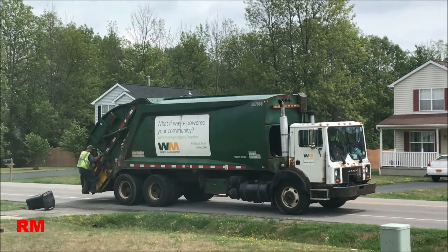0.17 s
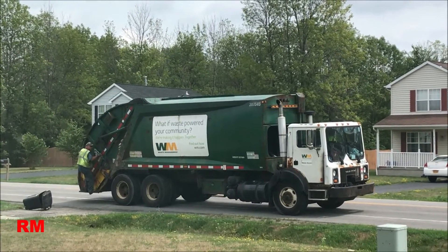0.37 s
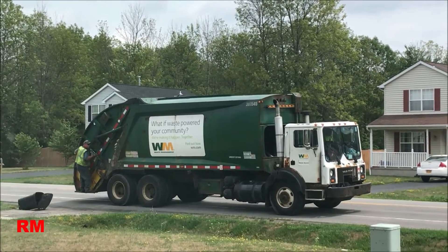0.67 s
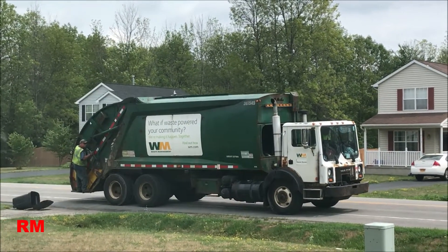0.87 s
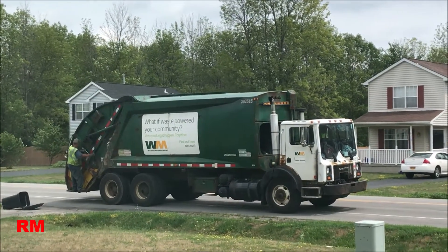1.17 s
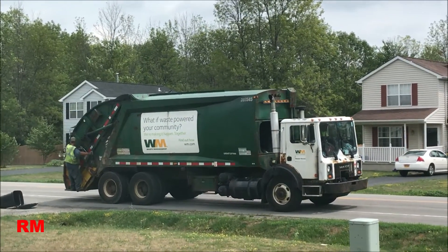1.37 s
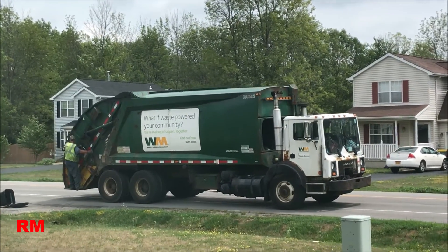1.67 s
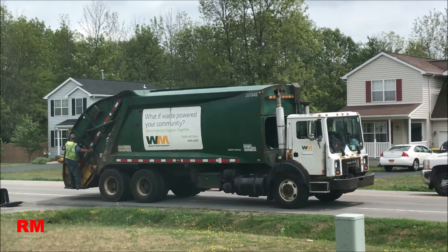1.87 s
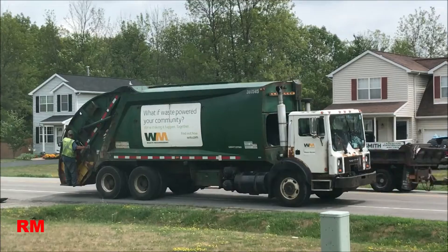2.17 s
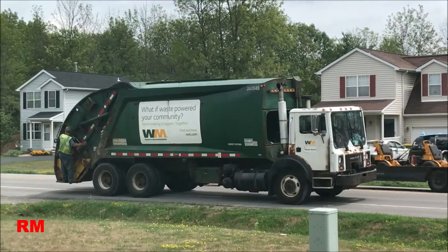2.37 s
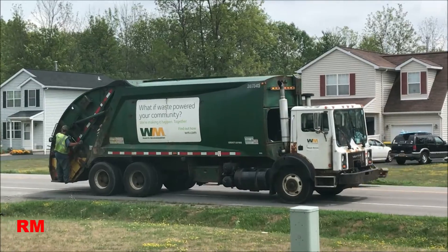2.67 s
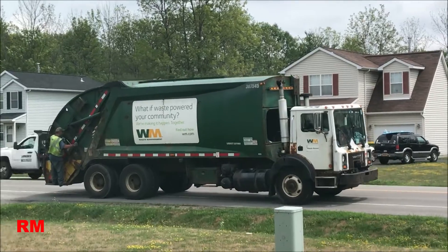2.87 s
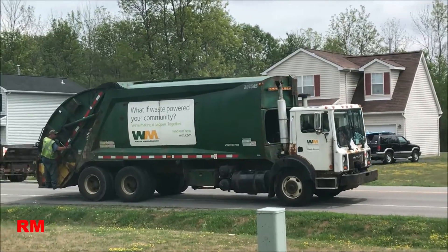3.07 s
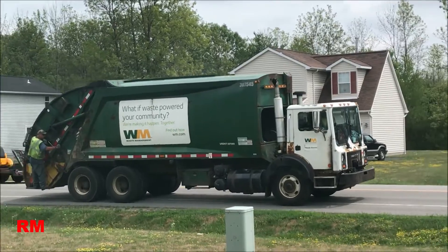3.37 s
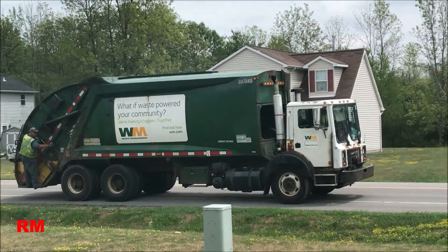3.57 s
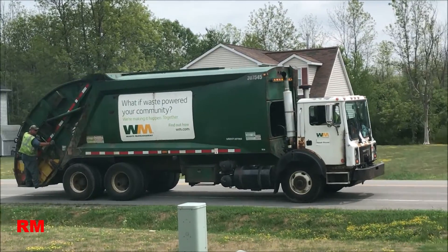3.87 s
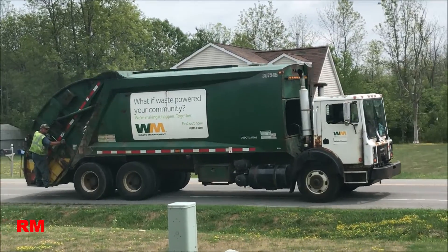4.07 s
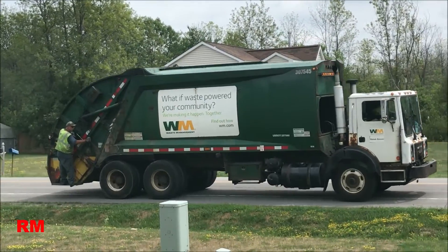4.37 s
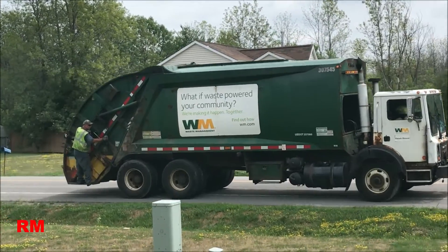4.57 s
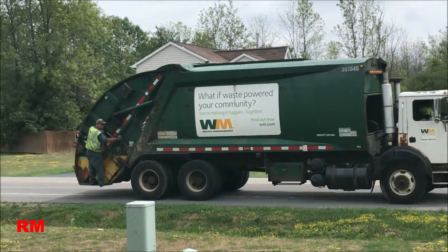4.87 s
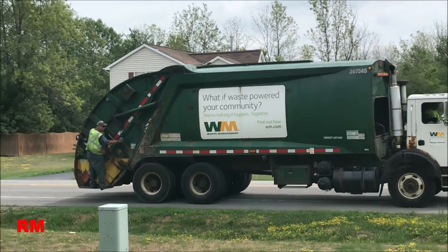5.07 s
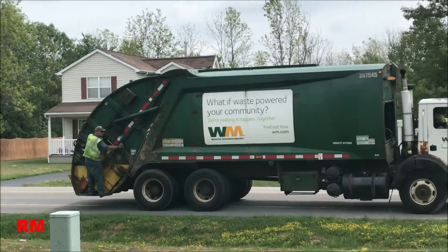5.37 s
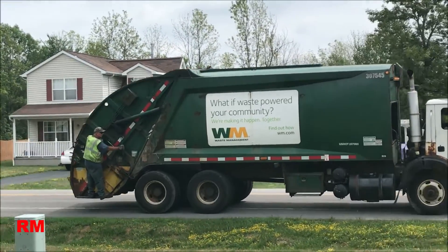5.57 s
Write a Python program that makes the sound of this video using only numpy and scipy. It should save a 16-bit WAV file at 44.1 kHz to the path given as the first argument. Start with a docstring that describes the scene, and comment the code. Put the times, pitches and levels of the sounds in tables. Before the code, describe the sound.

A garbage truck's diesel engine accelerates in booming surges as its body thumps and rattles, while sharp, dry clicks snap nearby.

```python
"""A diesel shudders and a body thumps: a refuse truck pulls away along a suburban street.
From the microphone, on a lawn across the road, its six cylinders climb to a boom, their overtones
sweeping through the exhaust pipe's resonances, then ease off. The block clatters, loose panels rattle
and buzz, and dragging brakes sing faintly. Another engine drones far off, a few sharp, dry clicks
sound close to the microphone, and now and then the treble dips for an instant."""
import sys
import numpy as np
from scipy import signal
from scipy.fft import rfft, irfft, next_fast_len
from scipy.io import wavfile

SR = 44100
rng = np.random.default_rng(int(sys.argv[2]) if len(sys.argv) > 2 else 0)


def waveform_to_disk(signal):
    """Save audio, clipped to [-1, 1], as 16-bit WAV at the path in sys.argv[1]."""
    frames = np.transpose(np.atleast_2d(signal))
    scaled = np.clip(frames, -1, 1) * 32767
    samples = np.round(scaled).astype(np.int16)
    wavfile.write(sys.argv[1], SR, samples)


N = 251811
TIME = np.arange(N) / SR

# the microphone's steady hiss: (frequency [Hz], density [dB])
HISS_SPECTRUM = [(2000, -12), (6000, 2), (7000, 1), (7700, -5.5), (8600, -0.5), (9700, -2.5), (10400, -16),
                 (11300, -2), (13000, 1), (16000, -0.5)]
# a coarser hiss that swells briefly once a second: (frequency [Hz], density [dB])
PULSE_SPECTRUM = [(1900, 7), (2500, 9.5), (3500, 2.5), (5500, -0.5), (9000, -15)]
# brief dips in the treble: (time [s], length [s], edge [Hz])
TREBLE_DIPS = [(.364, .013, 1900), (.492, .012, 1700), (.725, .014, 1400), (1.089, .012, 2200),
               (1.366, .013, 2200), (1.579, .012, 1900), (2.21, .028, 3300), (2.561, .013, 2200),
               (2.668, .012, 2200), (2.881, .013, 1800), (3.105, .025, 1300), (3.159, .012, 1800),
               (4.397, .011, 2000), (4.545, .012, 2600), (4.715, .013, 2400)]
# the far engine: (time [s], level [dB])
DRONE_LEVEL = [(0, -47.5), (.6, -51.5), (1.2, -60.5), (2.6, -58.5), (3.4, -59.5), (5.71, -61)]

# clicks by the microphone: (time [s], level [dB], knock gain [dB], tick gain [dB], low cut [Hz])
CLOSE_CLICKS = [(2.173, -33.5, -3, 1.5, 340), (2.2671, -49, -23, 11, 700), (2.322, -35, -21, -5, 676),
                (3.249, -46.5, -36, -16, 1800)]
# modes of the clicking part: (frequency [Hz], gain [dB], t60 [s])
SNAP_MODES = [(578, 10.5, 0.012), (920, -1, 0.014), (1600, -4, 0.007), (2550, 4.5, 0.002),
              (4040, 1, 0.0018), (4700, -28, 0.0025), (9150, -20, 0.0019), (11800, -11.5, 0.00075)]
# the diffuse wash after a click: (frequency [Hz], density [dB])
TAIL_SPECTRUM = [(450, 2.5), (900, 3), (1400, 0.5), (2000, -10.5), (3500, -7.5), (5000, -16.5),
                 (9000, -21.5)]

# brake drums singing across the road: (frequency [Hz], peak level [dB])
DRUM_MODES = [(2450, -84), (2640, -87), (3600, -83), (4010, -88.5), (4350, -89), (4580, -86), (4800, -84),
              (5000, -88.5)]
# a brake shoe catches: (time [s], half length [s], frequency [Hz], peak level [dB])
BRAKE_SQUEALS = [(0.32, 0.074, 4000, -81), (0.727, .025, 3930, -74), (0.88, .06, 3980, -80),
                 (1.11, .05, 3955, -72.5), (1.23, .07, 3995, -72.5), (1.385, .07, 4020, -75.5),
                 (1.3, 0.29, 3500, -83), (1.3, .2, 4300, -83), (1.556, 0.07, 4310, -77),
                 (1.4, .12, 4780, -82), (1.585, .025, 4850, -75), (1.7, 0.13, 4790, -77),
                 (1.92, .17, 4790, -82), (1.67, .03, 4030, -76), (1.98, .08, 3995, -73.5),
                 (2.18, .16, 4010, -76), (2.05, 0.2, 2600, -83), (2.1, 0.16, 3610, -78),
                 (2.497, 0.023, 3610, -73.5), (2.5, .05, 5000, -79.5), (2.74, 0.15, 5020, -79.5),
                 (2.86, .08, 4300, -79.5), (3.03, .04, 4850, -79.5), (3.05, 0.15, 4610, -81),
                 (3.5, 0.8, 2630, -81.5)]
# loose panels buzzing: (time [s], half length [s], frequency [Hz], peak level [dB])
PANEL_BUZZES = [(0.05, .18, 1560, -81), (0.03, .12, 1380, -79), (0.17, .1, 905, -76),
                (0.184, .022, 1210, -73), (0.19, .04, 1920, -77), (0.9, 1.2, 668, -75.5),
                (0.55, .45, 1010, -78.5), (1.5, .6, 930, -80), (1.455, .02, 1330, -73),
                (2.02, 0.069, 1220, -78), (2.6, .4, 630, -76), (3.7, 0.38, 1000, -81.5),
                (4.45, .15, 470, -70), (4.55, .08, 510, -70), (5.1, 0.16, 455, -72), (4.7, .35, 1600, -81),
                (4.6, 1.1, 1215, -82.5), (5.45, .45, 688, -73), (5.4, .25, 1130, -78),
                (5.4, .35, 480, -72.5)]
# the chassis rattling: (time [s], level [dB])
RATTLE_LEVEL = [(0, -75), (.4, -74.5), (1.1, -77), (2.0, -76.5), (2.7, -84), (3.4, -76.5), (4.5, -77.5),
                (5.71, -77.5)]
# modes of its loose metal: (frequency [Hz], gain [dB], t60 [s])
CHASSIS_MODES = [(700, -1.5, 0.06), (830, -4, 0.065), (950, 0, 0.055), (1060, 0.5, .05), (1211, -2, 0.079),
                 (1340, -4.5, 0.045), (1482, -4.5, .04), (1638, -5, .04), (1880, -7, 0.043),
                 (2070, -7, 0.032)]
# jolts as the truck moves off: (time [s], half length [s], peak level [dB])
BODY_JOLTS = [(0.191, 0.029, -50), (0.591, 0.013, -56)]
# modes of the jolted body: (frequency [Hz], gain [dB], t60 [s])
THUMP_MODES = [(108, 1, 0.11), (135, 6, 0.11), (165, -3, 0.081), (262, -11, 0.12), (330, -18, 0.06),
               (675, -21, 0.04), (1210, -26, 0.038)]

# engine speed: (time [s], firing rate [Hz])
FIRING_RATE = [(0, 34.3), (.3, 34.3), (.7, 42.3), (1.08, 46.3), (1.5, 49.9), (2.3, 57.7), (2.7, 62.6),
               (2.9, 66.3), (3.3, 72.8), (3.6, 77.3), (4.1, 80.7), (4.7, 93), (4.95, 91.6), (5.3, 87.7),
               (5.71, 80.4)]
# turbulent noise: (time [s], exhaust rumble [dB], block and tyres [dB], intake hiss [dB])
TURBULENCE_LEVELS = [(0, -63, -66.5, -77), (.3, -55.5, -67.5, -75), (.9, -54, -68, -74),
                     (1.5, -54, -69, -73.5), (2.1, -55.5, -67.5, -73), (2.7, -55, -70, -72),
                     (3.3, -65, -66.5, -71.5), (3.9, -61, -66.5, -72.5), (4.5, -60.5, -66.5, -72.5),
                     (5.1, -59, -65.5, -72.5), (5.71, -56.5, -67.5, -72.5)]
# the colours of those three: (frequency [Hz], density [dB])
RUMBLE_SPECTRUM = [(32, -26), (48, -3.5), (80, -0.5), (120, 0), (150, -4.5), (215, 0.5), (245, -7.5),
                   (300, -2.5), (335, -10.5), (380, -16), (500, -24.5)]
BLOCK_SPECTRUM = [(300, -2), (430, 4), (540, -1), (670, 1), (810, -5), (965, -5), (1090, -7.5),
                  (1230, -5.5), (1400, -10), (1550, -9), (1750, -12.5), (1950, -10), (2200, -13),
                  (2550, -15), (3200, -16.5), (5000, -30.5)]
INTAKE_SPECTRUM = [(1800, -14), (2500, 1.5), (3100, -3), (3600, 4.5), (3950, 7), (4300, 3), (4650, -1),
                   (5500, -6), (7000, -12)]
# base strength of the exhaust's overtones: (time [s], level [dB])
ENGINE_LOAD = [(0, -70.5), (.35, -63), (1.5, -63), (2.2, -59.5), (2.8, -59), (3.3, -55), (3.9, -58),
               (4.8, -54.5), (5.2, -56), (5.71, -52.5)]
# broad colour of exhaust pipe and body: (frequency [Hz], gain [dB])
PIPE_COLOUR = [(24, -48), (36, 1), (44, 9), (50, 11.5), (62, 3.5), (100, 3.5), (135, -5), (170, -6),
               (230, -8), (290, -11), (340, -11.5), (400, -22), (490, -14), (700, -30)]
# their narrow resonances: (frequency [Hz], width [Hz], gain [dB])
PIPE_RESONANCES = [(42.7, 7, -2), (88.5, 3.7, 3), (99, 32, 2), (171.2, 7.7, 7), (216, 13, 4.5),
                   (240, 12, 0.5), (289.7, 40, 10), (317, 19, 8), (373.5, 25, 9), (392, 11, 7)]
# overtones that stand out: (order [cycles per six firings], gain [dB])
ORDER_BOOSTS = [(7, 8.5), (9, 4), (12, 11.5), (13, 2), (16, 4.5), (18, 10), (20, 6), (22, 2), (24, 8),
                (26, 5.5), (28, 4.5), (30, 6.5), (32, 4.5), (36, 6)]
# single overtones growl: (order [cycles per six firings], time [s], half length [s], peak level [dB])
ORDER_GROWLS = [ (12, 0.53, 0.13, -52.5), (12, 1.34, 0.8, -53.5), (12, 1.95, 0.11, -55.5),
                (18, 0.74, 0.16, -55), (24, .8, 0.16, -57.5), (24, 1.257, 0.13, -56.5), (24, 1.7, .12, -55),
                (18, 2.187, 0.3, -51.5), (30, 2.428, 0.076, -51.5), (24, 2.58, 0.11, -58.5),
                (12, 2.7, .2, -54.5), (20, 2.62, 0.11, -56), (18, 2.75, 0.13, -55.5), (30, 2.85, .35, -59),
                (24, 2.93, 0.19, -56.5), (12, 3.35, 0.22, -55.5), (9, 3.14, 0.24, -50.5),
                (26, 3.04, 0.29, -54), (18, 3.26, 0.16, -51), (20, 3.23, 0.14, -53),
                (24, 3.38, 0.13, -49.5), (26, 3.65, 0.23, -58), (30, 3.6, 0.051, -61),
                (24, 3.85, 0.26, -54), (16, 3.57, 0.45, -58), (22, 3.68, .12, -55.5),
                (22, 4.08, 0.15, -54.5), (12, 4.25, 0.17, -50.5), (13, 4.13, 0.1, -53),
                (20, 4.45, 0.25, -57), (28, 3.02, .4, -61.5), (19, 4.45, 0.14, -55),
                (33, 4.54, 0.074, -62.5), (12, 4.64, 0.13, -51), (18, 4.68, .17, -53.5),
                (32, 4.85, 0.25, -66), (16, 4.9, 0.34, -54), (13, 4.92, 0.22, -53.5), (14, 5.0, .15, -56),
                (24, 4.4, .25, -59.5), (24, 5.15, 0.13, -58.5), (14, 3.94, .3, -59), (3, 5.1, 0.41, -47.5),
                (18, 5.14, 0.27, -54.5), (18, 5.6, .2, -54.5), (12, 5.55, .15, -54), (20, 5.45, 0.21, -50),
                (21, 5.68, 0.085, -49)]
# the surging boom at the firing rate: (time [s], level [dB])
BOOM_LEVEL = [(.15, -65), (.4, -49.5), (.62, -43), (.95, -52.5), (1.1, -36), (1.62, -30), (1.75, -34),
              (2.3, -37.5), (2.76, -44), (3.05, -33), (3.6, -34), (4.2, -28.5), (4.58, -35.5),
              (4.72, -46.5), (5.03, -43), (5.4, -29.5), (5.58, -30), (5.71, -41.5)]


def from_db(db):
    return 10 ** (np.asarray(db) / 20)


def unit_rms(x):
    return x / np.sqrt(np.mean(x ** 2) + 1e-20)


def in_time(rows):
    """Each column of a curve at every sample."""
    times, *columns = np.transpose(rows)
    return [np.interp(TIME, times, column) for column in columns]


def at_hz(spectrum, hz):
    """A spectrum read on a log-frequency axis."""
    points_hz, points_db = np.transpose(spectrum)
    return np.interp(np.log(np.maximum(hz, 1)), np.log(points_hz), points_db)


def swell(s, half_length, db):
    """A smooth rise and fall around a moment."""
    return from_db(db) * np.exp(-((TIME - s) / half_length) ** 2)


def drift(rate_hz):
    """A slow random wander; rms 1."""
    step, settle = 100, 1000
    pole = np.exp(-2 * np.pi * rate_hz * step / SR)
    kicks = rng.standard_normal(N // step + settle + 2)
    slow = signal.lfilter([1], [1, -2 * pole, pole * pole], kicks)[settle:]
    return np.interp(np.arange(N) / step, np.arange(len(slow)), unit_rms(slow))


def noise(spectrum, ripple_db=0.0, ripple_hz=41.14):
    """Coloured noise with steep skirts, optionally rippled by crowded panel resonances; rms 1."""
    size = next_fast_len(N)
    hz = np.arange(size // 2 + 1) * SR / size + 1
    ripple = ripple_db * np.interp(hz / ripple_hz, np.arange(1000), rng.standard_normal(1000))
    skirts = 1 / np.sqrt((1 + (spectrum[0][0] / hz) ** 8) * (1 + (hz / spectrum[-1][0] / 2) ** 8))
    colour = from_db(at_hz(spectrum, hz) + ripple) * skirts
    return unit_rms(irfft(rfft(rng.standard_normal(size)) * colour, size)[:N])


def ring(force, hz, t60):
    """One mode: a unit click starts a decaying sine of height 1."""
    pole, angle = from_db(-60 / (t60 * SR)), 2 * np.pi * hz / SR
    return signal.lfilter([0, np.sin(angle)], [1, -2 * pole * np.cos(angle), pole * pole], force + 1e-18)


def unsteady_tone(hz, width_hz):
    """A narrow band of noise around a pitch; rms 1."""
    angle = 2 * np.pi * np.cumsum(hz + np.zeros(N)) / SR
    return unit_rms(drift(width_hz) * np.cos(angle) + drift(width_hz) * np.sin(angle))


def microphone_hiss(floor_db=-76.5, every_s=1.0):
    """The microphone's fine, steady hiss; and, apart from it, a coarser hiss that swells briefly at a regular
    beat."""
    pulses = sum(swell(s, half_length=0.033, db=-69) for s in np.arange(every_s, N / SR, every_s))
    return from_db(floor_db) * noise(HISS_SPECTRUM) + pulses * noise(PULSE_SPECTRUM)


def far_engine(hz=49.67):
    """A low note from far off; it beats against the truck's firing rate as the truck moves away."""
    drone_db, = in_time(DRONE_LEVEL)
    return np.sqrt(2) * from_db(drone_db) * np.sin(2 * np.pi * hz * TIME)


def close_clicks(tick_above_hz=4500):
    """A small hard part snaps by the microphone; a heavy blow wakes its lowest mode, a light one clacks."""
    out = 0
    for s, level_db, knock_db, tick_db, low_cut_hz in CLOSE_CLICKS:
        blow = signal.unit_impulse(N, int(s * SR))
        snap = 0
        for k, (hz, mode_db, t60) in enumerate(SNAP_MODES):
            colour_db = knock_db * (k == 0) + tick_db * (hz > tick_above_hz)
            polarity = (-1) ** (k // 2)
            snap += polarity * ring(blow * from_db(level_db + mode_db + colour_db), hz, t60)
        low_cut = signal.butter(2, low_cut_hz, "high", fs=SR, output="sos")
        out += signal.sosfilt(low_cut, snap + 1e-12 * rng.standard_normal(N))
    return out


def click_tails(gain_db=-13, t60=.065):
    """A heavy click dies away in a brief wash; a light one stays dry."""
    fade = 0
    for s, level_db, knock_db, *_ in CLOSE_CLICKS:
        decay_db = 60 * np.abs(TIME - s) / t60
        fade += from_db(level_db + knock_db + gain_db - decay_db) * (TIME > s)
    return fade * noise(TAIL_SPECTRUM)


def squeal(hz, wander_hz=17.0, chatter_db=2.0, flutter_depth=.6, slip_hz=32.0):
    """A brake shoe sticks and slips: one line that wanders in pitch and flutters in level; rms 1."""
    angle = 2 * np.pi * np.cumsum(hz + wander_hz * drift(25)) / SR
    slip_angle = 2 * np.pi * np.cumsum(slip_hz * (1 + .3 * drift(15))) / SR
    flutter = 1 + flutter_depth * np.sin(slip_angle)
    chatter = from_db(chatter_db * np.clip(drift(45), -3, 1.5))
    return unit_rms(np.sin(angle) * flutter * chatter)


def brakes(width_hz=53.0, wander_hz=18.0):
    """Shoes brush their drums, faint from across the road: all modes sing, and at times some squeal."""
    singing = sum(from_db(db) * unsteady_tone(hz + wander_hz * drift(11), width_hz)
                  for hz, db in DRUM_MODES)
    squeals = sum(swell(s, half_length, db) * squeal(hz) for s, half_length, hz, db in BRAKE_SQUEALS)
    drag = swell(s=2.7, half_length=1.2, db=0)
    return drag * singing + squeals


def panel_buzz(width_hz=16.0):
    """The engine shakes one panel after another into an unsteady hum."""
    return sum(swell(s, half_length, db) * unsteady_tone(hz, width_hz)
               for s, half_length, hz, db in PANEL_BUZZES)


def chassis_rattle(knocks_per_s=45, spread_db=2.5):
    """Loose metal knocks at random; each knock rings the modes with strengths of its own."""
    rattle_db, = in_time(RATTLE_LEVEL)
    hits = rng.random(N) < knocks_per_s / SR
    knocks = hits * from_db(spread_db * np.clip(rng.standard_normal(N), -2, 2))
    ringing = sum(from_db(db) * ring(knocks * rng.uniform(-0.96, 1, N), hz, t60)
                  for hz, db, t60 in CHASSIS_MODES)
    return from_db(rattle_db) * unit_rms(ringing)


def body_thumps():
    """As the truck jerks into motion, panels knock together in a brief flurry that rings the body."""
    flurry = rng.standard_normal(N) * sum(swell(*jolt) for jolt in BODY_JOLTS)
    # the root evens out the greater build-up of long-ringing modes
    return sum(from_db(db) * np.sqrt(4 * np.log(1000) / (t60 * SR)) * ring(flurry, hz, t60)
               for hz, db, t60 in THUMP_MODES)


def engine_turbulence(firings, knock_depth=0.05, puff_depth=0.029, flicker_db=.9):
    """Exhaust rumble, block clatter and intake hiss; the last two swell at every firing."""
    rumble_db, block_db, intake_db = in_time(TURBULENCE_LEVELS)
    beat = np.cos(2 * np.pi * firings)
    rumble = from_db(rumble_db) * noise(RUMBLE_SPECTRUM)
    block_gain = from_db(block_db + flicker_db * drift(12)) * (1 + knock_depth * beat)
    block = block_gain * noise(BLOCK_SPECTRUM, ripple_db=2.1, ripple_hz=30.04)
    intake_gain = from_db(intake_db) * (1 + puff_depth * beat)
    intake = intake_gain * noise(INTAKE_SPECTRUM, ripple_db=1.1, ripple_hz=39.9)
    return rumble + block + intake


def pipe_gain(hz):
    """Pipe and body colour an overtone, and lift it as the revs sweep it through a resonance."""
    peaks = sum((from_db(db) - 1) / (1 + (2 * (hz - centre) / width) ** 2)
                for centre, width, db in PIPE_RESONANCES)
    return from_db(at_hz(PIPE_COLOUR, hz)) * (1 + peaks)


def order_db(order, base_db=-12.5, crank_db=3.5, knee_order=23.8, fade_db_per_order=0.42):
    """Lines on whole crank turns (even orders) are stronger, some stand out, and the highest fade."""
    boost_db = sum(db for k, db in ORDER_BOOSTS if round(k) == order)
    fade_db = fade_db_per_order * max(order - knee_order, 0)
    return base_db + crank_db * (order % 2 == 0) + boost_db - fade_db


def easing_loss_db(order, hz, start_s=4.24, ramp_s=0.85, firing_db=6.5, top_db=7, edge_hz=302):
    """The driver eases off: harmonics of the firing rate and the highest lines weaken."""
    eased = np.clip((TIME - start_s) / ramp_s, 0, 1)
    above_edge = np.clip((hz - edge_hz) / 20, 0, 1)
    return eased * (firing_db * (order % 6 == 0) + top_db * above_edge)


def exhaust_overtones(firing_hz, firings, waver_db=2.0, growl_waver_db=1.03):
    """Unequal cylinders put lines on the multiples of the six-firing cycle, sliding with the revs."""
    load_db, = in_time(ENGINE_LOAD)
    out = 0
    for order in np.setdiff1d(np.arange(3, 43), 6):  # order 6 is the boom
        multiple = order / 6
        hz = firing_hz * multiple
        waver = drift(6.9)
        line_db = load_db + order_db(order) - easing_loss_db(order, hz) + waver_db * waver
        growl = sum(swell(s, half_length, db)
                    for k, s, half_length, db in ORDER_GROWLS if round(k) == order)
        gain = np.maximum(from_db(line_db) * pipe_gain(hz), growl * from_db(growl_waver_db * waver))
        wobble = (.15 + .05 * max(order - 24, 0)) * drift(9)  # the highest lines are the least steady
        out += gain * np.sin(2 * np.pi * (firings * multiple + rng.random()) + wobble)
    return np.sqrt(2) * out


def exhaust_boom(firings, waver_db=0.88):
    """The firing rate itself leaves the stack and carries across the road as an almost pure tone."""
    boom_db, = in_time(BOOM_LEVEL)
    return np.sqrt(2) * from_db(boom_db + waver_db * drift(9.5)) * np.sin(2 * np.pi * firings)


def scene():
    """One microphone on the lawn: the truck across the road, an engine far off, clicks close by."""
    firing_hz, = in_time(FIRING_RATE)
    firings = np.cumsum(firing_hz) / SR
    engine = exhaust_boom(firings) + exhaust_overtones(firing_hz, firings) + engine_turbulence(firings)
    truck = engine + brakes() + body_thumps() + panel_buzz() + chassis_rattle()
    return (truck + far_engine() + close_clicks() + click_tails() + microphone_hiss())[None]


def record(dry, dip_db_per_s=1098, cutoff_hz=15800):
    """The treble dips for hundredths of a second, deeper in the longer dips; the very top is cut."""
    sound = dry
    for s, length, edge_hz in TREBLE_DIPS:
        low = signal.sosfiltfilt(signal.butter(2, edge_hz, fs=SR, output="sos"), sound)
        dip_db = dip_db_per_s * length * swell(s, length / 2, 0)
        sound = low + (sound - low) * from_db(-dip_db)
    return signal.sosfilt(signal.ellip(10, .1, 80, cutoff_hz, fs=SR, output="sos"), sound)


dry = scene()
out = record(dry)
waveform_to_disk(out)
```